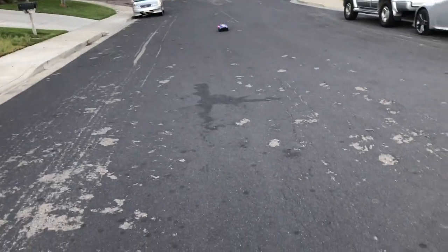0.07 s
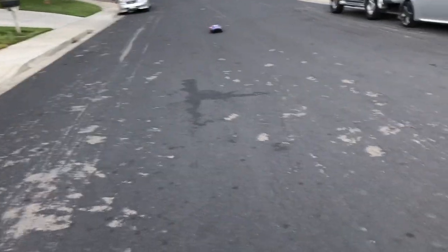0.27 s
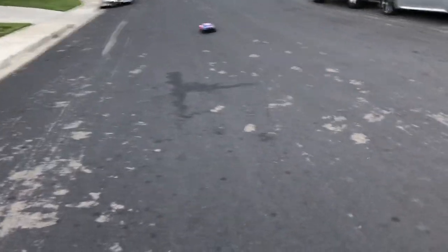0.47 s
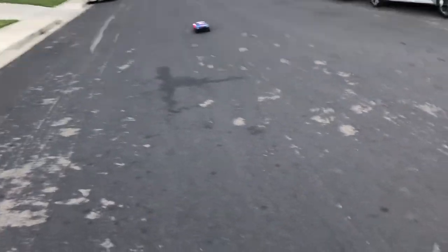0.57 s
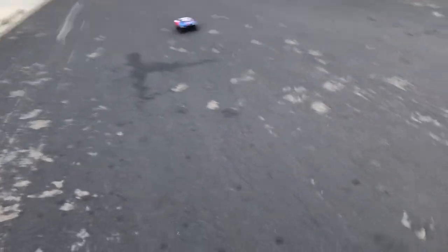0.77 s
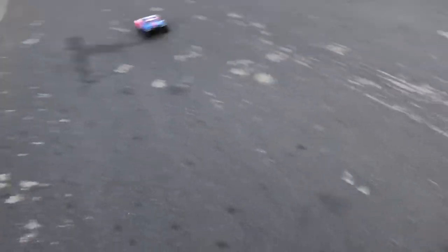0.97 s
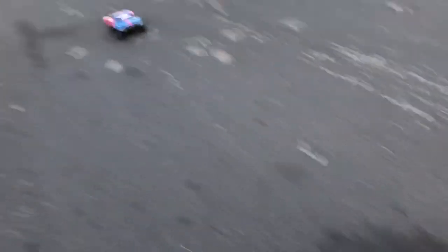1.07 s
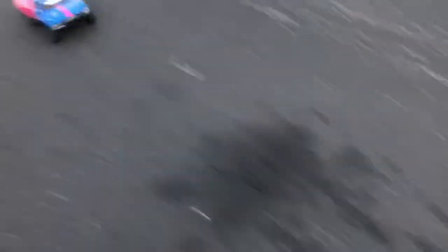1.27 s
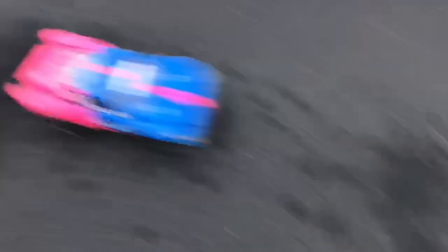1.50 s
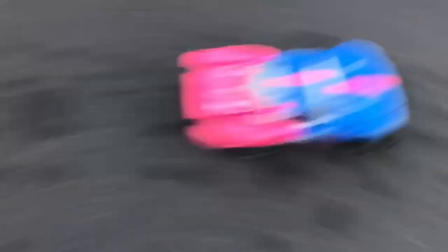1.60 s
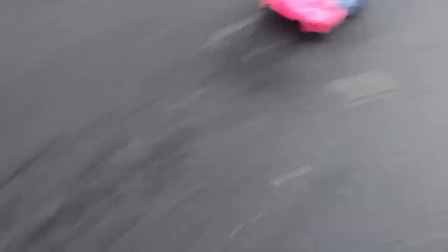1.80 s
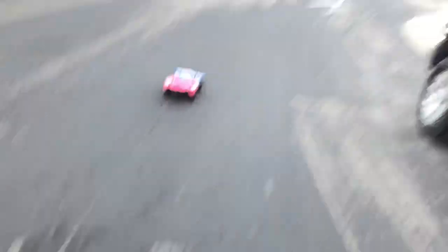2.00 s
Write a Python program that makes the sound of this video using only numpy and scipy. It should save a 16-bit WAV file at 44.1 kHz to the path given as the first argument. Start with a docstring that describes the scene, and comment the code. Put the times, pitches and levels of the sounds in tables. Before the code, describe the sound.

A small electric toy truck whines up the street, roars past very close, then fades away

```python
"""A small electric toy truck races up a street towards a hand-held microphone, its gears whining over
roaring tyres, while wind puffs thump on the microphone and bits of grit tick on the shell.
It grows louder, passes close by with a falling pitch, then turns away and fades as the breeze picks up.
Roar and breeze are shaped noise, gears are wavering tones, the chassis rings in narrow bands of noise,
grit is short noisy rings, and puffs are a few sagging pressure swings each."""
import sys
import numpy as np
from scipy import signal
from scipy.io import wavfile
from scipy.ndimage import uniform_filter1d, map_coordinates

SR = 44100
rng = np.random.default_rng(int(sys.argv[2]) if len(sys.argv) > 2 else 0)


def materialize(psi):
    """Save the field psi as 16-bit PCM at rate SR to the path in sys.argv[1].

    A 1-D psi becomes a single channel; in a 2-D psi each row is a channel.
    """
    bounded = np.clip(np.atleast_2d(psi).T, -1, 1)
    quanta = np.round(bounded * 32767).astype(np.int16)
    wavfile.write(sys.argv[1], SR, quanta)


def voltage_ratio(level):
    """Linear amplitude factor for a level in decibels (scalar or array-like)."""
    return 10 ** (np.asarray(level, float) / 20)


N = 90404  # length in samples
TIME_S = np.arange(N) / SR
PINION_TEETH, SPUR_TEETH = 20, 84
TREBLE_HZ = 8500  # where the treble begins


def evened(x):
    """Scales to rms 1."""
    return x / np.sqrt(np.mean(abs(x) ** 2) + 1e-20)


def curve(rows, axis, t=None):
    """Reads one column of a table along time."""
    rows = np.asarray(rows, float)
    return np.interp(TIME_S if t is None else t, rows[:, 0], rows[:, axis])


def read(points, hz):
    """Reads a spectrum with pitch on a log axis."""
    f, value = np.transpose(points)
    return np.interp(np.log(hz + 1), np.log(f + 1), value)


def drift(hz):
    """Slow random complex wandering of bandwidth hz, rms 1."""
    r = np.exp(-np.pi * hz / SR)
    length = N + SR // 4  # the extra start lets the filter settle
    z = rng.standard_normal(length) + 1j * rng.standard_normal(length)
    return evened(signal.lfilter([1], [1, -2 * r, r * r], z)[-N:])


# Motor speed as heard # Columns: time_s, turns_per_s
MOTOR_SPEED = [(0, 352), (.52, 360.2), (.91, 364.3), (1.17, 366.7), (1.3, 367.2), (1.56, 364.4),
               (1.63, 361.5), (1.7, 357.5), (1.8, 354), (2.05, 349.5)]


def speed(t=None):
    """Motor speed as heard, as a share of its top."""
    return curve(MOTOR_SPEED, axis=1, t=t) / np.max(MOTOR_SPEED)


def motor_angle():
    """Adds up the motor's turning over time, in radians."""
    return 2 * np.pi * np.cumsum(curve(MOTOR_SPEED, axis=1)) / SR


# How far the truck has turned: 0 shows its front, 1 its side, 2 its rear
# Columns: time_s, turned_0_to_2
TURNING = [(0, 0), (.9, .3), (1.3, .92), (1.65, 1.1), (1.79, 2)]


def facing(three, t=None):
    """Blends front, side and rear values as the truck turns."""
    turned = np.clip(curve(TURNING, axis=1, t=t), 0, 2)
    front = three[0] * np.maximum(1 - turned, 0)
    side = three[1] * (1 - abs(turned - 1))
    rear = three[2] * np.maximum(turned - 1, 0)
    return front + side + rear


# The levels of the pass; the last two columns tilt the tyre roar
# Columns: time_s, roar_level_db, whine_over_roar_db, extra_treble_db, extra_drone_db
PASS_LEVELS = [(0, -43, -8, -3, 1.5), (.16, -43, -4.5, -7, 3), (.45, -42, -1.5, -2.5, 1.5),
               (.8, -39.5, -5.5, -4, -0.5), (1.05, -37, -3, -3, -1), (1.23, -35.5, 0.5, -5, -2),
               (1.36, -32.5, -2, -5.5, -5.5), (1.47, -27.5, -2.5, -7.5, -6.5), (1.56, -27, 3.5, -5, -2),
               (1.6, -27, 2.5, -0.5, 0.5), (1.63, -26, 10.5, -1.5, 2), (1.68, -24, -2.5, -2, -4.5),
               (1.707, -24, 11.5, -3.5, 0.5), (1.735, -26.5, 6.5, 4, 0.5), (1.79, -26, 2, 0.5, 0.5),
               (1.88, -27.5, 3.5, -1, -4.5), (1.94, -30.5, -2, -0.5, 3.5), (1.98, -37, 2, -1, 6),
               (2.05, -38, 2, 1, -2)]


def passing(axis, t=None):
    """Reads one level of the pass along time, in dB."""
    return curve(PASS_LEVELS, axis, t)


def swell_db(hz):
    """High tones swell for about a third of a second on the approach."""
    shape = np.exp(-((TIME_S - .93) / .17) ** 4)  # centre s, half length s
    return (TREBLE_HZ < hz < 13500) * 6 * shape


def noise(db_of, patchy_db, flicker_db):
    """Random short-time spectra shaped by db_of(hz, t), with sliding patches and a flicker over time."""
    frames, hz = N // 128 + 5, np.fft.rfftfreq(512, 1 / SR)[:, None]
    t = np.arange(frames) * 128 / SR
    a, b, patches, flicker = rng.standard_normal((frames, 257, 4)).T
    patches = uniform_filter1d(patches, size=4, axis=0)
    patches = evened(uniform_filter1d(patches, size=24, axis=1))
    flicker = uniform_filter1d(flicker, size=70, axis=0)
    flicker = evened(uniform_filter1d(flicker, size=4, axis=1))
    # The patches slide with the pitch, but by its 8th power
    bins = np.arange(257)[:, None] / speed(t) ** 8
    places = np.broadcast_arrays(bins, np.arange(frames))
    patches = map_coordinates(patches, places, order=1, mode="mirror")
    db = db_of(hz, t) + facing(patchy_db, t) * patches + flicker_db * flicker
    return signal.istft((a + 1j * b) * voltage_ratio(db), nperseg=512, noverlap=384)[1][:N]


# Loudness of the breeze
# Columns: time_s, level_db
BREEZE_LEVEL = [(0, -50), (.45, -58), (.65, -51), (1.2, -45), (1.55, -45), (1.8, -36), (2.05, -36)]
# Colour of the breeze, nearly all low
# Columns: pitch_hz, relative_db_per_hz
BREEZE_SPECTRUM = [(15, -30), (58, 0), (110, -7), (200, -24), (600, -60)]


def breeze():
    """Wind as low, patchy noise that rises and falls."""
    low = noise(lambda hz, t: read(BREEZE_SPECTRUM, hz) + 0 * t, patchy_db=[2.4] * 3, flicker_db=1.0)
    return evened(low) * voltage_ratio(curve(BREEZE_LEVEL, axis=1))


# Wind puffs; the pitch is that at the start
# Columns: start_s, level_db, pitch_hz, length_s
WIND_PUFFS = [(0.026, -45, 158, 0.056), (0.148, -39, 91, 0.09), (.205, -47, 164, 0.096),
              (0.262, -45, 110, 0.058), (0.541, -46, 109, 0.069), (.553, -38, 263, 0.013),
              (.598, -39, 169, 0.035), (0.674, -38, 202, 0.048), (0.757, -43, 170, 0.03),
              (0.856, -44, 120, 0.022), (0.952, -38, 233, 0.025), (1.099, -48.5, 403, .04),
              (1.258, -25.5, 178, 0.059), (1.2653, -21.5, 505, .007), (1.444, -28, 560, 0.014),
              (1.647, -23, 124, 0.043), (1.751, -25, 418, 0.0245), (1.77, -28.5, 150, 0.057),
              (1.797, -28, 260, 0.034), (1.827, -25, 282, 0.039), (1.884, -27.5, 120, 0.02),
              (1.95, -29.5, 256, 0.051), (2.014, -33.5, 261, 0.036)]
PUFF_SAG = .62  # share of its pitch a puff loses by its end
PUFF_ROUGH = .98  # level of the unevenness
PUFF_RISE = .15  # share of its length a puff takes to rise


def puffs():
    """Wind thumps: a few sagging, uneven pressure swings each."""
    out = np.zeros(N)
    for (s, db, hz, length), row in zip(WIND_PUFFS, rng.standard_normal((len(WIND_PUFFS), 4000))):
        u = np.arange(0, length, 1 / SR)[:4000] / length  # 0 to 1 through the puff
        angle = 2 * np.pi * np.cumsum(hz * (1 - PUFF_SAG * u)) / SR
        swing = np.sqrt(2) * np.sin(angle + row[0])  # starts at a random point
        smooth = int(SR / hz / 6)
        rough = evened(uniform_filter1d(uniform_filter1d(row, smooth), smooth))[:len(u)]
        shape = np.minimum(u / PUFF_RISE, 1) * np.cos(np.pi * u / 2)
        puff = (swing + PUFF_ROUGH * rough * (1 - u) ** 2) * voltage_ratio(db) * shape
        part = out[round(s * SR):][:len(u)]
        part += puff[:len(part)]
    return out


def wind():
    """A low breeze with separate puffs on top."""
    return breeze() + puffs()


# Grit ticking on the shell; levels before the shared GRIT_DB and the fading of each ring
# Columns: start_s, level_db
GRIT_TICKS = [(.379, -35), (.605, -34), (.638, -32), (.99, -27), (1.222, -22), (1.471, -17)]
GRIT_HZ, GRIT_WIDTH_HZ = 6600, 1000
GRIT_DB, GRIT_T60_S = -2, .035  # shared level change, time to fade by 60 dB


def grit():
    """Each grain is a short noisy ring that starts fast and dies away."""
    out, t = np.zeros(N), np.arange(3000) / SR
    for (s, db), row in zip(GRIT_TICKS, rng.standard_normal((len(GRIT_TICKS), 2, 3000))):
        z = uniform_filter1d(row, size=int(SR / GRIT_WIDTH_HZ), axis=1)
        ring = evened((z[0] + 1j * z[1]) * np.exp(2j * np.pi * GRIT_HZ * t)).real
        fade = np.minimum(t / .0011, 1) * voltage_ratio(db + GRIT_DB - 60 * t / GRIT_T60_S)
        part = out[round(s * SR):][:3000]
        part += (ring * fade)[:len(part)]
    return out


# Narrow rings of the chassis, shaken by the road; pitch as heard at top motor speed
# Columns: pitch_hz, width_hz, front_over_roar_db, side_over_roar_db, rear_over_roar_db
CHASSIS_RINGS = [(3290, 170, -11.5, -14, -12), (4030, 180, -13, -25, -24), (3600, 220, -30, -19, -10),
                 (12800, 500, -25, -25, -30)]
SPUR_THROB = .8  # depth, 0 to 1


def chassis():
    """Ringing bands of noise that follow the heard pitch; the treble throbs with the spur gear."""
    spur = motor_angle() * PINION_TEETH / SPUR_TEETH
    clock = np.cumsum(speed()) / SR  # seconds stretched by the heard speed
    out = np.zeros(N, complex)
    for hz, width_hz, *db in CHASSIS_RINGS:
        ring = drift(width_hz) * np.exp(2j * np.pi * hz * clock)
        throb = 1 + SPUR_THROB * (hz > TREBLE_HZ) * np.cos(spur)
        out += voltage_ratio(facing(db) + swell_db(hz)) * ring * throb
    return np.sqrt(2) * out.real * voltage_ratio(passing(axis=1))


# Colour of the roar from the front, side and rear; pitch as heard at top motor speed
# Columns of each: pitch_hz, relative_db_per_hz
FRONT_COLOUR = [(150, -12.5), (250, -8.5), (582, -3), (895, -3), (1200, -6.5), (1450, 6), (1720, -3.5),
                (1880, -1), (1980, -5.5), (2840, -5), (3260, -2.5), (4940, -7.5), (5380, -6.5), (5860, -7),
                (7090, -1), (8570, -10.5), (9180, -12), (10200, -14.5), (15400, -17)]
SIDE_COLOUR = [(150, -19), (250, -3.5), (405, 1.5), (582, -4), (1060, -7.5), (1880, -9), (2390, -11.5),
               (3750, -11), (5970, -11.5), (7210, -11), (8720, -14), (15400, -16)]
REAR_COLOUR = [(150, -36), (250, 0), (347, -12), (927, -15.5), (1640, -15), (1820, -17), (2790, -23),
               (3500, -16), (6070, -21), (7090, -14), (9500, -24), (12100, -20), (15400, -23)]
DRONE_HZ = 900  # the low drone lies below this


def roar():
    """Tyres on asphalt through the chassis: noise whose treble and low drone swell by their own amounts."""
    def db_of(hz, t):
        source_hz = np.minimum(hz / speed(t), 15000)
        colour = facing([read(s, source_hz) for s in (FRONT_COLOUR, SIDE_COLOUR, REAR_COLOUR)], t)
        # The level is set by the power from 1 to 6 kHz
        middle = (hz > 1000) & (hz < 6000)
        own = 10 * np.log10((middle * voltage_ratio(2 * colour)).sum(0))
        treble = 1 / (1 + (TREBLE_HZ / (hz + 1)) ** 8)
        drone = 1 / (1 + (hz / DRONE_HZ) ** 4)
        tilt = treble * passing(axis=3, t=t) + drone * passing(axis=4, t=t)
        return colour - own + tilt + passing(axis=1, t=t)
    return noise(db_of, patchy_db=(.8, 2.5, 2.8), flicker_db=1.2)


# Parts of the whine, in dB from front, side and rear: clean mesh, spur side tones, tooth noise
MESH_DB, SPUR_DB, TOOTH_DB = (-7, -9, -11), (-10, -7, -6), (-10, -7, -7)
COVER_HZ, COVER_WIDTH_HZ = 7140, 650  # tooth noise in the gear cover
SPUR_FALL_DB = -2  # for each step away from the mesh tone
WOBBLE_DB, WOBBLE_HZ = 2.5, 15


def whine(turns):
    """Pinion teeth meet the spur gear; its unevenness adds side tones, and tooth noise fills the cover."""
    mesh, spur = np.exp(1j * PINION_TEETH * turns), turns * PINION_TEETH / SPUR_TEETH
    clean = voltage_ratio(facing(MESH_DB) + WOBBLE_DB * drift(WOBBLE_HZ).real)
    clean = clean * np.exp(.5j * drift(WOBBLE_HZ).real)  # wavering phase
    sides = sum(voltage_ratio(SPUR_FALL_DB * abs(k)) * drift(13) * np.exp(1j * k * spur)
                for k in (-5, -4, -3, -2, -1, 1, 2, 3))
    teeth = drift(COVER_WIDTH_HZ) * np.exp(2j * np.pi * COVER_HZ * TIME_S)
    out = mesh * (clean + voltage_ratio(facing(SPUR_DB)) * evened(sides)) + voltage_ratio(facing(TOOTH_DB)) * teeth
    return out * voltage_ratio(passing(axis=2))


# Tones of motor and axle, the axle mesh at 5.113 and its overtones among them
# Columns: multiple_of_motor_speed, width_hz
GEAR_TONES = [(1.615, 16), (5.113, 18), (10.226, 55), (15.34, 35), (25.57, 200), (40, 110)]
# Levels of these tones, row by row
# Columns: front_over_roar_db, side_over_roar_db, rear_over_roar_db
GEAR_TONE_LEVELS = [(-50, -12, -26), (-12, -18, -15), (-25, -8, -19), (-11, -20, -25), (-18, -23, -32),
                    (-29, -19, -16)]


def gears():
    """The whine with the wavering tones of motor and axle, all tied to the motor's turning."""
    turns = motor_angle()
    out = whine(turns)
    for (multiple, width_hz), db in zip(GEAR_TONES, GEAR_TONE_LEVELS):
        level = voltage_ratio(facing(db) + swell_db(multiple * np.max(MOTOR_SPEED)))
        waver = min(.75, 45 / width_hz) + .7 * drift(width_hz)  # a steady part and a random one
        out += level * waver * np.exp(1j * multiple * turns)
    return np.sqrt(2) * out.real * voltage_ratio(passing(axis=1))


def scene():
    """Truck and wind at one microphone."""
    return (roar() + chassis() + gears() + grit() + wind())[None]


def band_limit(x):
    """A steep low-pass at the top of the band."""
    return signal.sosfilt(signal.butter(12, 16350, fs=SR, output="sos"), x)


def record(dry):
    """The microphone cuts the deepest bass, the recorder the top."""
    bass_cut = signal.butter(4, 46, "high", fs=SR, output="sos")
    top_cut = signal.firwin(1023, 15740, window=("kaiser", 9), fs=SR)
    mix = signal.sosfilt(bass_cut, dry)
    mix = signal.oaconvolve(mix, top_cut[None], "same")
    return band_limit(mix)


dry = scene()
out = record(dry)
materialize(out)
```